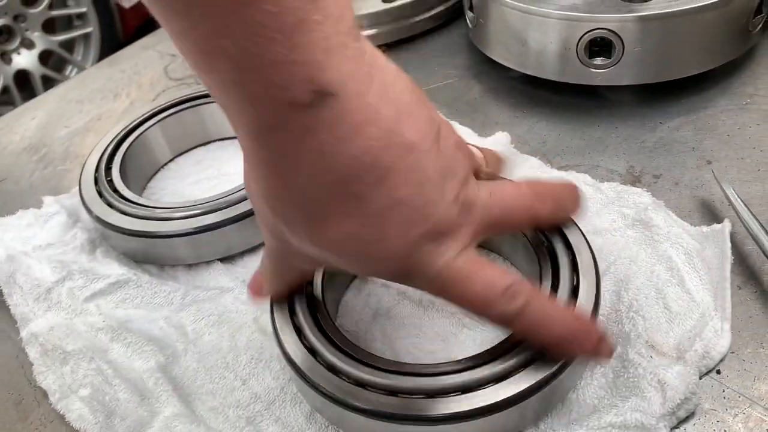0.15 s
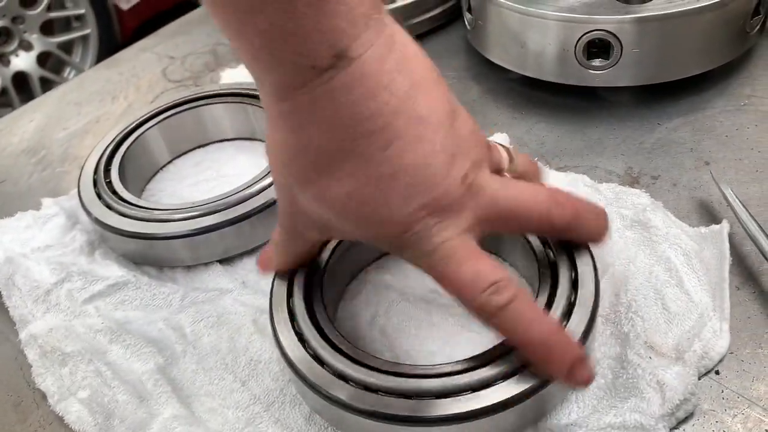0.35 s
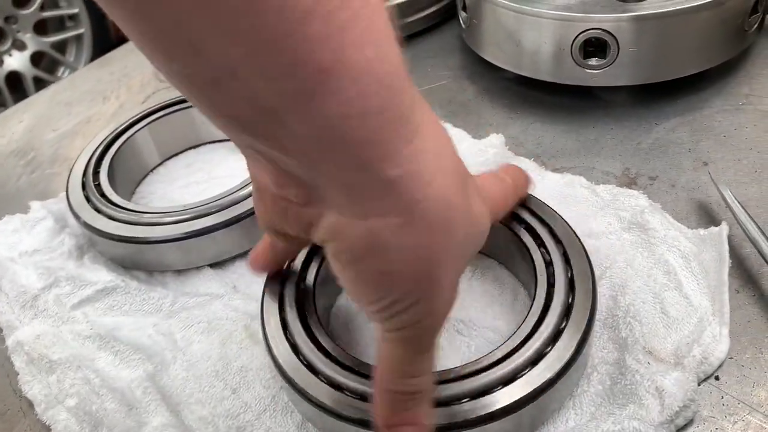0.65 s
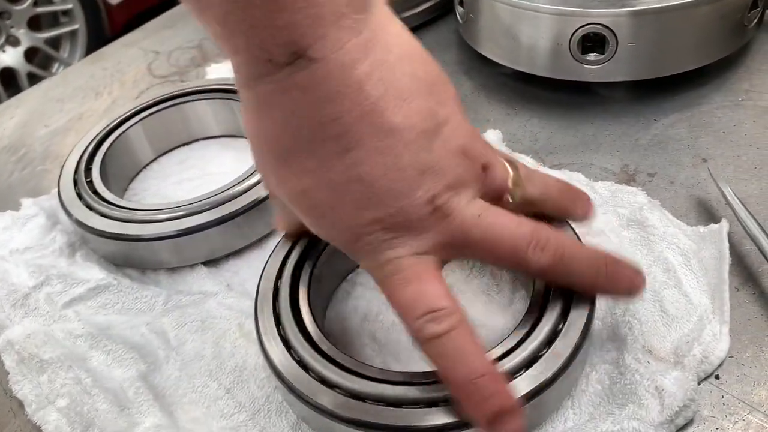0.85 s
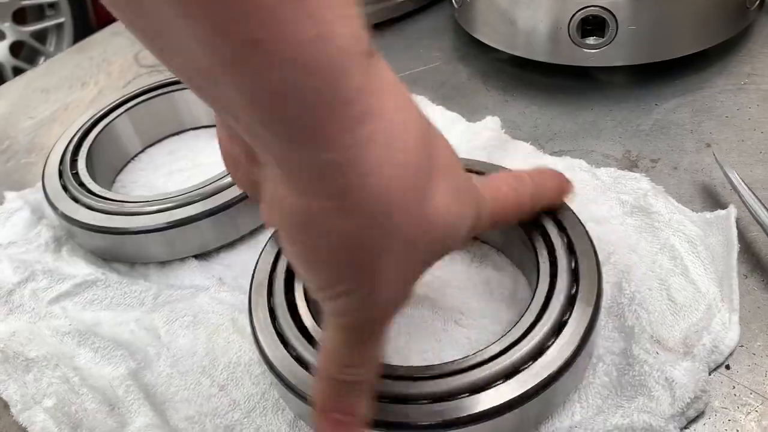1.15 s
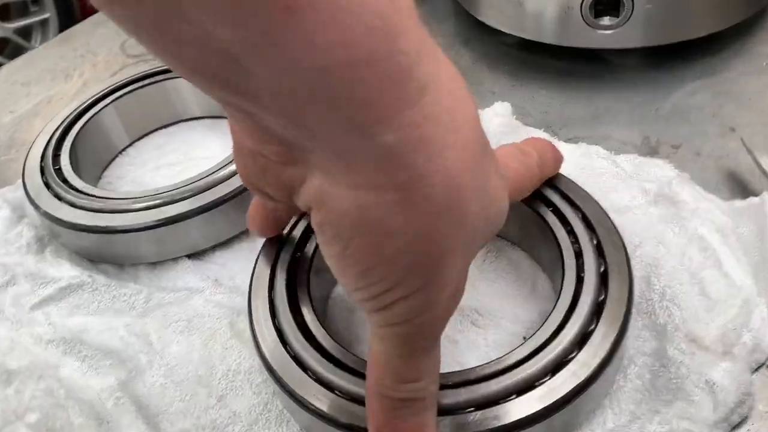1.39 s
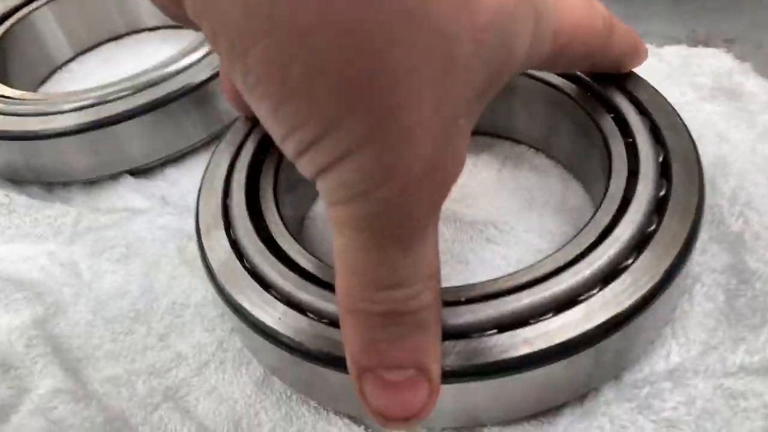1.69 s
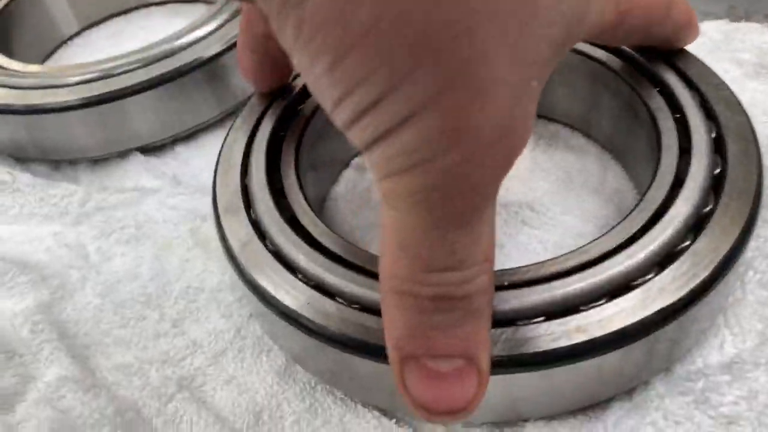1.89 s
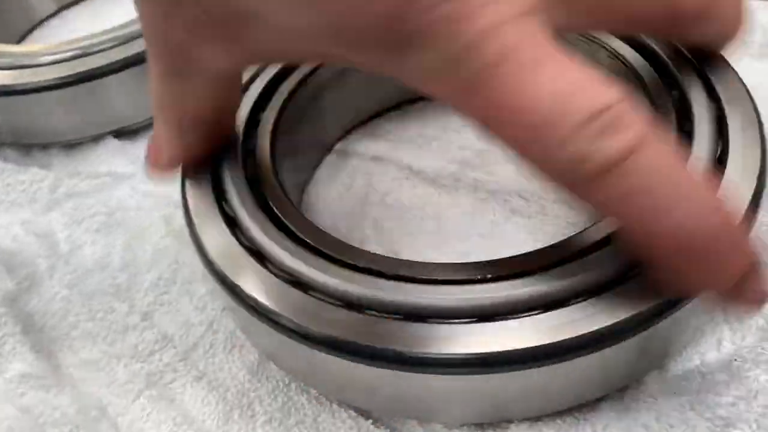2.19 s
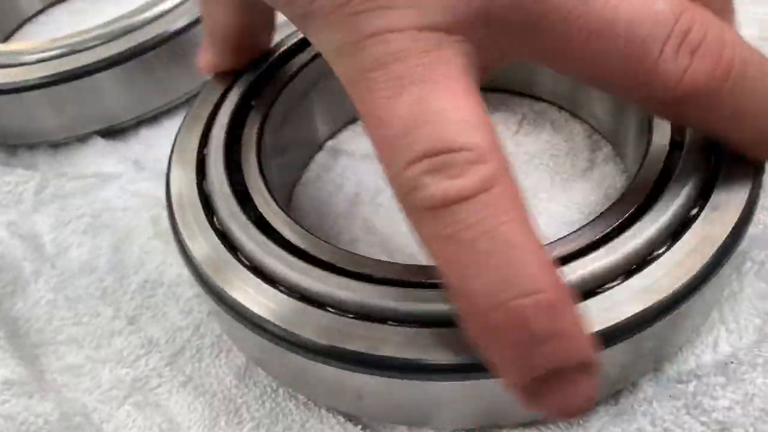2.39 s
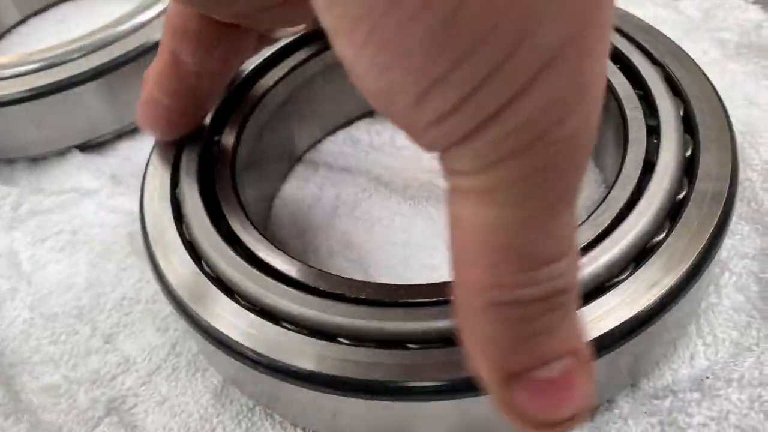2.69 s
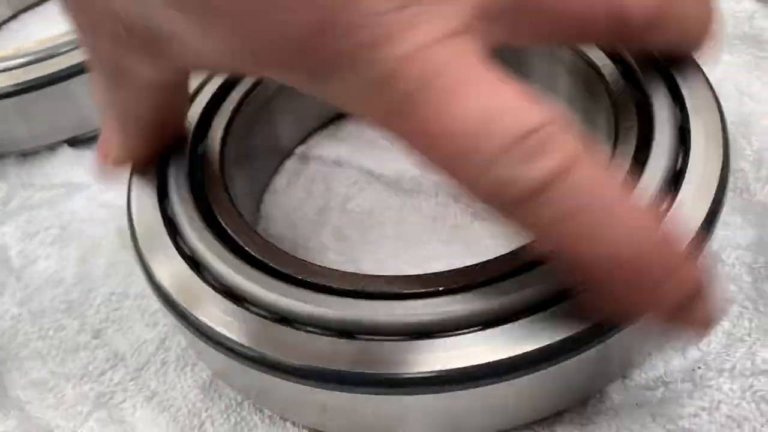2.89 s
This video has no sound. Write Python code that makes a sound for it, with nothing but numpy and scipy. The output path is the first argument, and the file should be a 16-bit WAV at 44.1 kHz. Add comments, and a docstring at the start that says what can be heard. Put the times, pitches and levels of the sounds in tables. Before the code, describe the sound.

Low, lumpy grinding from a heavy steel bearing turned in short strokes, with dull clacks and bright metallic clicks, a quieter pause with soft nudges, then louder turning; miked close, low machine rumble behind.

```python
"""In a humming workshop, a worn roller bearing on a towel on a steel bench is twisted back and forth by hand.
There are seven strokes and one pause, with two faint far-off noises and two dull nudges in the pause.
Rollers bumping over the pitted race shake the low tones of bearing and bench. Grit crunches and roller ends
scrape as bursts of noise, clicks excite the steel rings, and each deep pit gives a jolt and a clack."""
import sys
import numpy as np
from scipy import signal
from scipy.fft import rfft, irfft, next_fast_len
from scipy.io import wavfile
from scipy.ndimage import uniform_filter1d, map_coordinates

SR = 44100
rng = np.random.default_rng(int(sys.argv[2]) if len(sys.argv) > 2 else 0)


def to_wav(s):
    """Save 16-bit WAV."""
    ch = np.atleast_2d(s).T  # columns
    pcm = np.round(np.clip(ch, -1, 1) * 32767)  # PCM
    wavfile.write(sys.argv[1], SR, pcm.astype(np.int16))


N = 134505  # length in samples


def amp(db):
    """Turn decibels into a gain."""
    return 10 ** (np.asarray(db) / 20)


def unit(x):
    """Scale to an rms of 1 over all channels together."""
    return x / np.sqrt(np.mean(x ** 2) + 1e-20)


def along(points, hz):
    """Read a curve of (Hz, value) points, with pitch on a log axis."""
    f, value = np.transpose(points)
    return np.interp(np.log(hz + 1), np.log(f + 1), value)


def filtered(x, response):
    """Multiply the spectrum of x by a response that depends on frequency."""
    size = next_fast_len(N + SR // 2)
    spectrum = rfft(x, size) * response(np.fft.rfftfreq(size, 1 / SR))
    return irfft(spectrum, size)[..., :N]


def coloured(x, curve):
    """Shape the tone of x with a (Hz, dB) curve."""
    return filtered(x, lambda f: amp(along(curve, f)))


def resonance(f, centre, width):
    """Response of one ringing mode: strongest at its centre, wider when more damped."""
    return 1j * f * width / (centre ** 2 - f ** 2 + 1j * f * width)


def noise(alike):
    """White stereo noise; a mix of middle and side sets how alike left and right are."""
    def blend(f):
        turn = np.arccos(np.clip(along(alike, f), -1, 1)) / 2
        return np.array([np.cos(turn), np.sin(turn)])
    mid, side = filtered(rng.standard_normal((2, N)), blend)
    return np.array([mid + side, mid - side])


def impulses(rows):
    """Place one impulse for each row of (seconds, dB)."""
    start, db = np.transpose(rows)
    return np.bincount(np.round(start * SR).astype(int), amp(db), N)[:N]


def scatter(rate, spread_db):
    """Random impulses of uneven size, on average 'rate' a second."""
    happens = rng.random(N) < rate / SR
    return happens * amp(spread_db * np.clip(rng.standard_normal(N), -2, 2))


# The steady colour of the workshop. Each row: pitch in Hz, relative level in dB.
SHOP = [(25, -11.5), (50, -2), (90, 1.5), (150, 0.5), (210, -3.5), (300, -12.5), (600, -24), (950, -24.5),
        (1400, -31.5), (2000, -37.5), (4000, -45.5), (7000, -60), (10000, -50.5), (12000, -77),
        (13500, -49), (16000, -79)]
# How alike the room noise is on both sides. Each row: pitch in Hz, likeness (1 is the same on both sides).
SHOP_ALIKE = [(50, 0.89), (200, 0.94), (500, 0), (2000, 0)]
SHOP_DB = -43.5


def workshop():
    """Steady machine-room rumble: shaped noise, slightly louder on the left."""
    return amp(SHOP_DB) * unit(coloured(noise(SHOP_ALIKE), SHOP)) * amp([[1], [-1]])


# Far-off noises. Each row: start in seconds, level in dB, centre in Hz, width in octaves,
# time in seconds to fade by 60 dB.
FAR = [(1.472, -57.5, 1590, 0.97, 0.88), (1.68, -52.5, 900, 0.46, 0.83)]
FAR_RISE_S = 0.0049


def far_noises():
    """Bands of noise that start quickly and die away, as sounds do across a large space."""
    out = np.zeros((2, N))
    for start, db, hz, octaves, t60 in FAR:
        t = np.maximum(np.arange(N) / SR - start, 0)
        bell = lambda f: np.exp(-.5 * (np.log2((f + 1) / hz) / octaves) ** 2)
        band = unit(filtered(noise(SHOP_ALIKE), bell))
        out += band * amp(db - 60 * t / t60) * (1 - np.exp(-t / FAR_RISE_S))
    return out


def tone(hz, width):
    """A wavering tone of rms 1: noise squeezed twice through a narrow resonance."""
    return unit(filtered(noise(SHOP_ALIKE), lambda f: resonance(f, hz, width) ** 2))


# Machines running in the shop. Each row: pitch in Hz, level in dB.
HUM = [(92, -54.5), (146, -49.5), (942, -74), (1254, -73), (1438, -75.5)]
# Faint tones that swell and fade. Each row: pitch in Hz, level in dB, loudest moment in seconds,
# seconds from there until it has dropped to about a third.
WHINES = [(1195, -79, 0.08, 0.2), (1445, -62, 0.085, .2), (2961, -78, 1.3, 0.18)]
HUM_WIDTH_HZ, WHINE_WIDTH_HZ = 15.7, 10  # width of each resonance, before it is applied twice


def hum():
    """Faint wavering tones of running machines, and thin whines that come and go."""
    t = np.arange(N) / SR
    out = np.zeros((2, N))
    for hz, db in HUM:
        out += amp(db) * tone(hz, HUM_WIDTH_HZ)
    for hz, db, loudest, half in WHINES:
        swell = np.exp(-((t - loudest) / half) ** 2)
        out += amp(db) * swell * tone(hz, WHINE_WIDTH_HZ)
    return out


# How long the room rings. Each row: pitch in Hz, seconds to fade by 60 dB.
ROOM_T60 = [(200, 0.68), (2000, 0.54), (5000, 0.62), (12000, 0.15)]


def room(x):
    """The workshop's echo: half a second of noise in which each pitch dies at its own speed."""
    hz, t, grid = signal.stft(rng.standard_normal((2, SR // 2)), SR, nperseg=256)
    fade = amp(-60 * t / along(ROOM_T60, hz)[:, None])
    tail = signal.istft(grid * fade, SR, nperseg=256)[1]
    return signal.fftconvolve(x, tail / np.linalg.norm(tail[0]), axes=1)[:, :N]


# The hand nudging the bearing while it rests. Each row: start in seconds, peak level in dB.
NUDGES = [(1.355, -37), (1.791, -28.5)]
NUDGE_HZ, NUDGE_S = 109, 0.003  # pitch; time for the push to reach full strength


def nudges():
    """Soft, dull pushes: a low tone that swells and dies before it can ring."""
    out = np.zeros(N)
    for start, db in NUDGES:
        t = np.maximum(np.arange(N) / SR - start, 0)
        push = t / NUDGE_S * np.exp(1 - t / NUDGE_S)
        out += amp(db) * push * np.sin(2 * np.pi * NUDGE_HZ * t)
    return out


# Twists of the hand. Each row: start, full speed, slowing and stop, all in seconds, then the
# strength in dB of rumble, grit and scrape.
STROKES = [(-.04, 0.114, 0.13, 0.35, -26, -55.5, -53), (0.292, 0.358, 0.537, 0.604, -27, -57, -55),
           (0.553, 0.769, 0.783, 0.95, -25, -55.5, -50.5), (0.919, 1.052, 1.1, 1.306, -25.5, -54.5, -53.5),
           (2.002, 2.11, 2.218, 2.372, -31, -57, -53.5), (2.323, 2.513, 2.572, 2.704, -24.5, -55, -49),
           (2.664, 2.855, 2.85, 3.093, -24.5, -52.5, -48.5)]
RUMBLE_GROWS, GRIT_GROWS = 1.685, 0.79  # powers: rumble over speed; grit over the force of the rumble


def strokes():
    """Speed of turning, and the strengths of rumble, grit and scrape that follow it."""
    t = np.arange(N) / SR
    speeds = np.array([np.interp(t, row[:4], [0, 1, 1, 0]) for row in STROKES])
    rumble_db, grit_db, scrape_db = np.transpose(STROKES)[4:]
    force = speeds ** RUMBLE_GROWS
    rumbling = amp(rumble_db) @ force
    grit = amp(grit_db) @ force ** GRIT_GROWS
    rub = amp(scrape_db) @ force
    return speeds.sum(0), rumbling, grit, rub


# How alike contact noise is on both sides. Each row: pitch in Hz, likeness (1 is the same on both sides).
ALIKE = [(500, 0.027), (2000, 0.018), (5500, 0.28), (8000, 0.76), (14000, 1)]
CONTACT_S, CONTACT_RISE_S = 0.00024, 0.0005  # hold before fading; speed of the rise


def bursts(hits, t60):
    """Turn every impulse into a brief contact and a dying burst of noise, adding their energies."""
    t = np.arange(SR // 10) / SR
    shape = amp(-60 * np.maximum(t - CONTACT_S, 0) / t60) * (1 - np.exp(-t / CONTACT_RISE_S))
    energy = signal.fftconvolve(hits ** 2, shape ** 2)[:N]
    return np.sqrt(np.abs(energy)) * noise(ALIKE)


# Ringing of the steel rings. Each row: pitch in Hz, width in Hz, relative level in dB.
RINGS = [(4200, 360, -5), (4790, 890, -12), (6760, 310, -5), (7450, 107, -1), (8000, 61, -0.5),
         (8790, 200, -1.5), (9860, 120, 3), (10660, 41, 1), (12270, 290, -6), (12700, 57, 1),
         (14800, 130, -22)]
# Broad crack of a steel contact. Each row: pitch in Hz, relative level in dB.
CRACK = [(300, -39), (1200, -22), (2200, -12.5), (4200, -10), (6000, -8.5), (8500, -6), (11500, -7.5),
         (13800, -9.5), (14500, -22), (15400, -33), (16200, -53)]
STEEL_TOP_HZ, LEFT_LAG_S = 13900, 0.000215


def steel(x):
    """The rings' modes and the broad crack, reaching the left side a little later."""
    def response(f):
        ringing = sum(amp(db) * resonance(f, hz, width) for hz, width, db in RINGS)
        h = amp(along(CRACK, f)) + ringing * f / np.hypot(f, 2000)  # weaker ringing below 2 kHz
        h = h / np.sqrt(1 + (f / STEEL_TOP_HZ) ** 20)  # steep loss at the top
        lag = np.array([np.exp(-2j * np.pi * f * LEFT_LAG_S), np.ones_like(f)])
        return unit(np.abs(h)) * np.exp(1j * np.angle(h)) * lag
    return filtered(x, response)


# Extra colour of the grit. Each row: pitch in Hz, relative level in dB.
GRIT_COLOUR = [(2000, 5), (4500, 7.5), (7000, 1.5), (10000, 0.5), (11600, -7), (13000, 1.5), (15000, -13)]
# Colour of the scrape. Each row: pitch in Hz, relative level in dB.
SCRAPE = [(200, -48), (450, -16), (600, 2.5), (780, 6), (1060, 4), (1250, 9), (1800, -4.5), (2500, -0.5),
          (4500, -6.5), (8000, -12.5), (16000, -21)]
GRAINS_PER_S, GRAIN_SPREAD_DB, GRAIN_T60 = 600, 2, 0.013  # rate at full speed; unevenness; fade in s
SCRAPES_PER_S, CLUMPS_PER_S, CLUMP_DB = 700, 70, 3.2  # CLUMP_DB is the unevenness of the clumps


def grinding(speed, grit, rub):
    """Grit cracks under the rollers in clumps, and their ends scrape along the rib."""
    cracks = scatter(GRAINS_PER_S * (1 + speed) / 2, GRAIN_SPREAD_DB)
    grains = coloured(steel(bursts(cracks, GRAIN_T60)), GRIT_COLOUR)
    scrape = coloured(bursts(scatter(SCRAPES_PER_S, spread_db=3.5), t60=0.026), SCRAPE)
    # A smooth random curve makes grit and scrape swell together.
    knots = np.clip(rng.standard_normal(N * CLUMPS_PER_S // SR + 4), -2, 1)
    clumps = amp(CLUMP_DB * map_coordinates(knots, [np.arange(N) * CLUMPS_PER_S / SR]))
    crunch = grit * unit(clumps * grains)
    return crunch + rub * unit(clumps * scrape) * amp([[1], [-1]])  # scrape leans left


# Rollers knocking against cage and rings. Each row: moment in seconds, relative strength in dB.
CLICKS = [(.0185, -44), (.0702, -52), (.1035, -41.5), (.1225, -44), (.162, -59), (.1822, -46), (.2087, -42),
          (.2414, -46), (.2524, -37), (.3173, -43.5), (.3344, -34.5), (.3545, -53), (.4242, -37),
          (.4423, -32), (.4508, -32.5), (.4738, -39), (.4822, -44), (.5075, -42), (.522, -33), (.5281, -32),
          (.5374, -27), (.5467, -32), (.5571, -36), (.6548, -43.5), (.6714, -42), (.6916, -62),
          (.7205, -39.5), (.7525, -41.5), (.7717, -44.5), (.8085, -41), (.8184, -39.5), (.9785, -44),
          (.9975, -49), (1.008, -35.5), (1.021, -46), (1.04, -41), (1.0555, -31), (1.068, -26.5),
          (1.0974, -24.5), (1.153, -32.5), (1.1672, -29.5), (1.1804, -37.5), (1.1945, -45), (2.0242, -54.5),
          (2.0512, -46), (2.0865, -36.5), (2.1011, -27.5), (2.1172, -29), (2.1274, -32), (2.142, -29),
          (2.1484, -30), (2.162, -25.5), (2.1814, -24), (2.2035, -32.5), (2.2262, -33.5), (2.2328, -33),
          (2.2451, -41.5), (2.4546, -50), (2.4656, -34.5), (2.4987, -15), (2.53, -22), (2.5655, -32),
          (2.576, -28), (2.5838, -26.5), (2.5934, -29), (2.6251, -33.5), (2.7246, -45), (2.7567, -33),
          (2.7622, -32.5), (2.7738, -37), (2.8108, -31), (2.8172, -29), (2.826, -32), (2.832, -32),
          (2.868, -33.5), (2.8975, -26.5), (2.9202, -32), (2.95, -37.5)]
CLICK_DB, CLICK_T60 = -0.5, 0.017  # gain; fade in seconds


def clicks():
    """Loose rollers snap against the steel: short bursts that excite the rings."""
    return amp(CLICK_DB) * steel(bursts(impulses(CLICKS), CLICK_T60))


# Colour of the clack. Each row: pitch in Hz, relative level in dB.
CLACK = [(250, -30), (520, 0), (720, -3), (1050, -14), (1280, -9), (1900, -26), (5000, -39), (12000, -52)]
# Rollers dropping into deep pits. Each row: moment in seconds, relative strength in dB,
# pitch of the jolt in Hz.
PITS = [(.099, -25, 226), (.136, -26.5, 214), (.177, -22, 205), (.213, -24, 164), (.352, -18.5, 167),
        (0.385, -23, 225), (.408, -22, 169), (.428, -22, 229), (.446, -19, 250), (.476, -19, 205),
        (0.508, -23, 188), (0.718, -28, 196), (0.758, -22, 223), (0.775, -30, 213), (.799, -20, 261),
        (0.824, -26, 199), (1.027, -18, 215), (1.07, -25.5, 246), (1.106, -26.5, 197), (1.133, -19, 269),
        (1.15, -21.5, 218), (2.107, -18, 209), (2.171, -26, 179), (2.196, -22.5, 178), (2.236, -26.5, 176),
        (2.407, -28.5, 181), (2.452, -44, 181), (2.487, -18.5, 234), (2.518, -14.5, 220), (2.548, -21, 226),
        (2.577, -21.5, 179), (2.719, -29, 201), (2.798, -20.5, 208), (2.834, -21, 185), (2.862, -26, 206),
        (2.892, -22.5, 171), (2.935, -23, 171)]
CLACK_DB, CLACK_T60 = -15, 0.05  # hard contact on top of each jolt: gain; fade in seconds
KNOCK_DB, KNOCK_T60, KNOCK_RISE_S = -21, 0.067, 0.005  # overtone: gain; fade and rise in seconds
KNOCK_RATIO, KNOCK_SPREAD = 2.8, 0.144  # overtone pitch over the jolt's; scatter of its logarithm


def clacks():
    """A roller landing in a pit gives a dull clack, with an overtone that differs from pit to pit."""
    hits = impulses([row[:2] for row in PITS])
    knocks, t = np.zeros((2, N + SR)), np.arange(SR // 8) / SR
    shape = amp(-60 * t / KNOCK_T60) * (1 - np.exp(-t / KNOCK_RISE_S))
    for (start, db, hz), (detune, *phases) in zip(PITS, rng.standard_normal((len(PITS), 3))):
        pitch = hz * KNOCK_RATIO * np.exp(KNOCK_SPREAD * detune)
        wave = np.sin(2 * np.pi * pitch * t + np.array(phases)[:, None])  # own phase on each side
        first = round(start * SR)
        knocks[:, first:first + len(t)] += amp(db + KNOCK_DB) * shape * wave
    return knocks[:, :N] + amp(CLACK_DB) * coloured(bursts(hits, CLACK_T60), CLACK)


JOLT_S, JOLT_DB = 0.0017, 24  # fading time of the push a pit gives the bench; its gain


def jolts():
    """Each pit gives the bench a short, heavily damped push of its own pitch."""
    out, t = np.zeros(N + SR), np.arange(SR // 20) / SR
    for start, db, hz in PITS:
        first = round(start * SR)
        out[first:first + len(t)] += amp(db) * np.exp(-t / JOLT_S) * np.sin(2 * np.pi * hz * t)
    return amp(JOLT_DB) * out[:N] * 2 / (JOLT_S * SR)


# Low tones of the bearing on the bench. Each row: pitch in Hz, width in Hz before the resonance is
# squared, relative level in dB, how much louder the left side is in dB.
BENCH = [(84, 38, -24, 7), (112.4, 24.4, -0.5, 2), (145, 23, 1.5, 0), (187.3, 56, -2, 2),
         (218.4, 38.2, 3.5, -6.5), (265.5, 23.3, 5, 1), (290.5, 92, -9.5, -11.5), (439.6, 33.4, -9, 18),
         (515, 143, -18.5, 11)]


def bench(x):
    """The low, steep-sided modes of the heavy bearing on the bench, with average energy gain 1."""
    def response(f):
        h = 0
        for k, (hz, width, db, pan) in enumerate(BENCH):
            sides = amp(db + np.array([[pan], [-pan]]) / 2)
            h = h + (-1) ** k * sides * resonance(f, hz, width) ** 2  # neighbours have opposite signs
        return h / np.sqrt(np.mean(np.abs(h) ** 2))
    return filtered(x, response)


BUMPS_PER_S, BUMP_SPREAD_DB = 700, 2.5  # rate at full speed; unevenness
STEADY_S = 0.07  # the rolling's level is evened out over this many seconds, so each stroke's strength sets it
RUMBLE_DB, THUMP_DB = -5, 7.5  # gains of the rolling and of the thump under each click


def rumble(speed, strength):
    """Rollers bump over the worn race, more often when faster; pits and clicks add thumps."""
    bumps = scatter(BUMPS_PER_S * (1 + speed) / 2, BUMP_SPREAD_DB)
    roll = bench(bumps * np.sign(rng.standard_normal(N)))
    power = uniform_filter1d(np.mean(roll ** 2, axis=0), int(STEADY_S * SR))
    roll = roll / np.sqrt(np.abs(power) + 1e-12)
    thumps = bench(jolts() + amp(THUMP_DB) * impulses(CLICKS))
    return amp(RUMBLE_DB) * strength * roll + thumps


ROOM_DB = -20  # gain of the room's echo


def scene():
    """The turning bearing close by, in the workshop."""
    background = workshop() + far_noises() + hum()
    speed, strength, grit, rub = strokes()
    bearing = nudges() + grinding(speed, grit, rub) + clicks() + clacks() + rumble(speed, strength)
    return background + bearing + amp(ROOM_DB) * room(bearing)


def record(dry):
    """Keep nothing at or above the band limit of 16.2 kHz."""
    return filtered(dry, lambda f: f < 16200)


dry = scene()
out = record(dry)
to_wav(out)
```